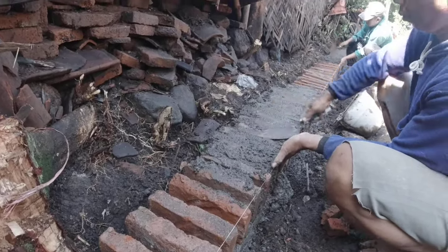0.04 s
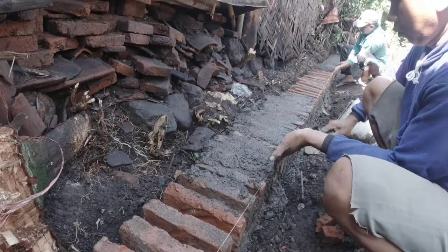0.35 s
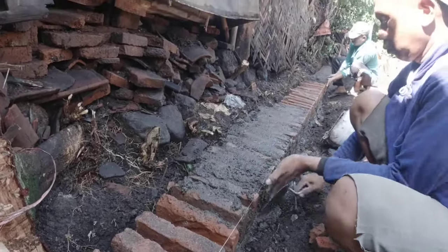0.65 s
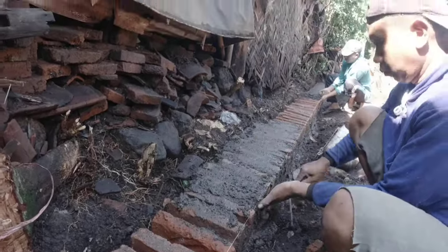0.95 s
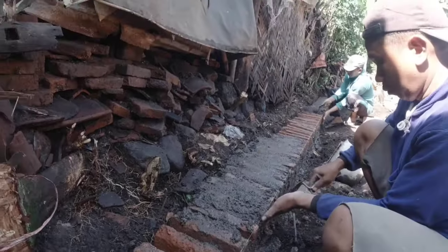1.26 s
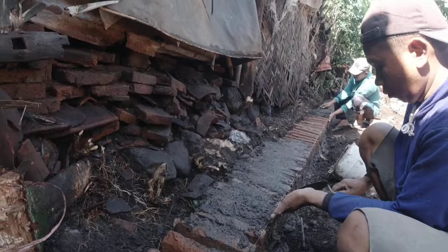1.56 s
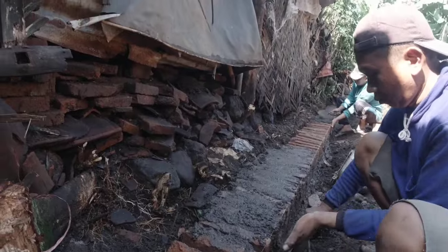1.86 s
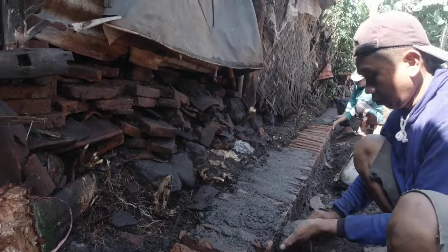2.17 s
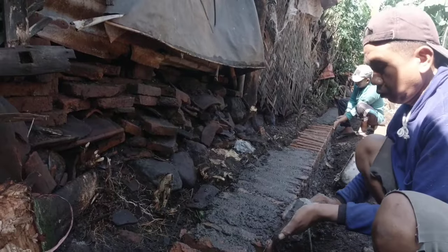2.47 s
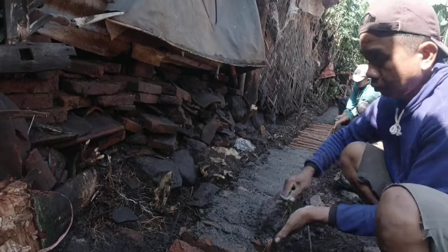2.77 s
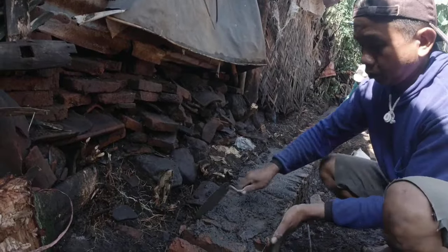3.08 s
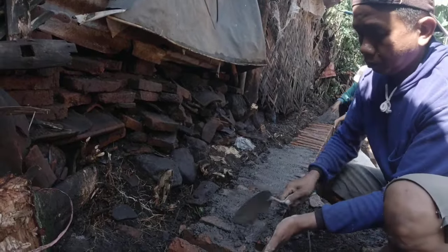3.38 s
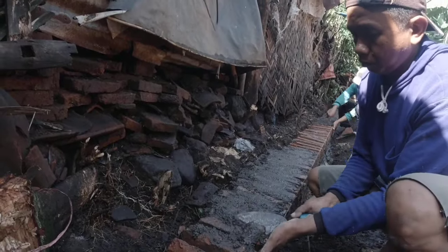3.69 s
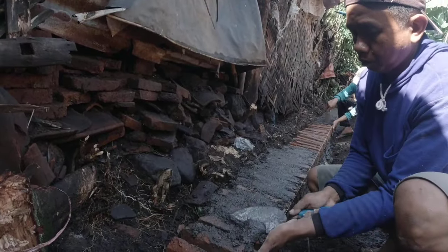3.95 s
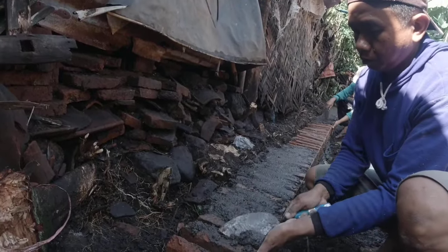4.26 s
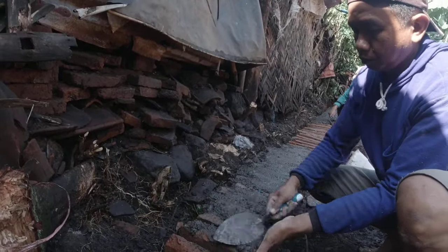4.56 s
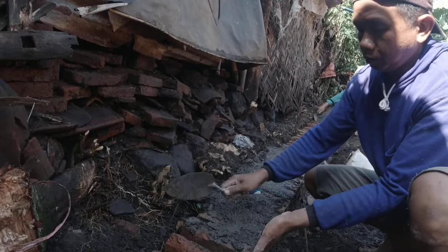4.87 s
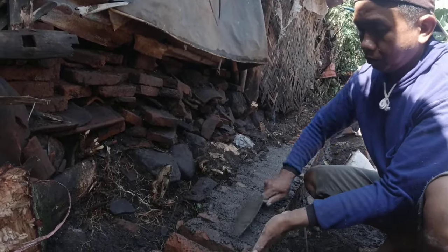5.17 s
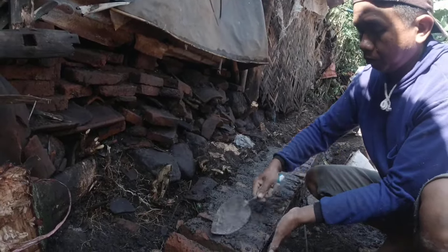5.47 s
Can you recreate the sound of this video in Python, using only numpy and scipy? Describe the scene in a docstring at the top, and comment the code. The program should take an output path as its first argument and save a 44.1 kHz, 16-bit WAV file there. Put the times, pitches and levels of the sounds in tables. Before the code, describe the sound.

Close by, a steel trowel scrapes sandy mortar over bricks with a few bright clinks. It then digs in a tub, giving hollow, muffled scrapes and knocks as wet lumps thud. After some faint brushing, the blade returns to the bricks for short, irregular strokes and ringing taps, with a heavier wet slap near the end. Only a faint outdoor rumble and hiss lies behind the work.

```python
"""Spreading mortar on bricks

A bricklayer works close by, outdoors. Sand grinds under the steel trowel, which rings
when its blade is free and goes dull in the wet mortar. A tub booms as mortar is scooped,
lumps thud and squelch, and between strokes the blade grazes the sand."""
import sys
import numpy as np
from scipy import signal
from scipy.fft import rfft, irfft, next_fast_len
from scipy.io import wavfile
from scipy.ndimage import uniform_filter1d

SR = 44100
rng = np.random.default_rng(int(sys.argv[2]) if len(sys.argv) > 2 else 0)


def materialize(psi):
    """Save the field psi as 16-bit PCM at rate SR to the path in sys.argv[1].

    A 1-D psi becomes a single channel; in a 2-D psi each row is a channel.
    """
    bounded = np.clip(np.atleast_2d(psi).T, -1, 1)
    quanta = np.round(bounded * 32767).astype(np.int16)
    wavfile.write(sys.argv[1], SR, quanta)


N = 243873

# Tone colours (how strong each pitch is): pitch_hz, level_db
AIR_COLOUR = [(20, -12.5), (55, 3.5), (80, -0.5), (160, -16.5), (400, -22.5), (1200, -23.5), (3200, -28),
              (5500, -28), (8500, -48.5), (16000, -45)]  # outdoor background
GRAZE_COLOUR = [(300, -22), (900, -18), (1800, -5.5), (3000, 3.5), (4400, -6), (5900, -7), (7500, -28),
                (9000, -62), (15000, -50)]  # sand touched lightly
SAND_COLOUR = [(30, -32), (60, 3.5), (110, -4.5), (170, 3), (400, 0), (800, -1), (1400, 0.5), (2200, -6),
               (4200, -2.5), (6300, -10), (7600, -14), (8600, -20.5), (11000, -16.5), (15000, -19)]  # sand ground under steel
SIDE_COLOUR = [(60, -23), (150, -20.5), (260, -16), (500, -9), (1100, -6), (2300, 1), (4400, -1),
               (15000, 0.5)]  # the part that differs between left and right
ECHO_COLOUR = [(200, -4.5), (3000, 1), (7000, 2.5), (12000, 0.5)]
SPLAT_COLOUR = [(60, -12.5), (200, 2.5), (550, 3.5), (1400, -7.5), (3000, -35), (9000, -62)]
# The notes the tub rings at: pitch_hz, width_hz, level_db
TUB_NOTES = [(76.8, 8.8, 10.5), (162.3, 16, -1.5), (188.6, 6.2, 13), (254, 5, -7), (285, 2.8, -5),
             (362, 16, -5.5), (488.8, 7.5, 13.5), (547.6, 3.3, 12), (574.8, 5.1, 10.5), (679, 7.6, 5.5),
             (801, 13.5, 7.5), (845, 4.7, 6.5)]
# The notes of the steel blade, free or pressed flat: pitch_hz, width_hz, free_db, pressed_db
BLADE_NOTES = [(1226, 13, -8.5, 19), (1286, 15, 17.5, 11), (1630, 6, 20.5, 0), (1784, 12, -3, 19.5),
               (1855, 16.6, 28, -14.5), (2326, 55, 0.5, 15.5), (2444, 11.74, 22, 13), (2518, 21, 19, 8.5),
               (3033, 16, 11, 16.5), (3324, 34, 17.5, 3), (3920, 16, 15.5, -2), (4270, 34, 21.5, -7.5),
               (4450, 8.6, 21, -8.5), (5120, 40, 15.5, -12.5), (5190, 34, 22, 0.5), (5440, 60, 20, -2),
               (5980, 19, 16, 16.5), (6400, 30, 24, 3.5), (6444, 25, 19.5, -5), (7490, 24, 21, 14.5),
               (9830, 26, 17.5, 13), (10650, 32, 11, -10), (12000, 23, 10, -11.5), (12200, 30, 24, -9),
               (13100, 63, 3, 13), (13800, 86, 12.5, 2), (13800, 81, 9, -6.5)]
# The sound's four bands (mortar rumble, blade rasp, grinding, sand fizz): low_hz, high_hz
BANDS = [(74, 900), (900, 2000), (2000, 8000), (8000, 16000)]
# How fast each band rises as the blade bites, one per band: rise_s
BAND_RISE_S = [0.0049, 0.001, 0.011, 0.0055]
# How each band stretches or shortens a stroke's fade, one per band: fade_factor
BAND_FADE = [1.28, 0.74, 0.92, 0.94]
# What each band gains by mid-stroke, where the blade is fastest, one per band: boost_db
BAND_BOOST_DB = [0.67, 0.48, 0.55, 3.7]

# The blade grazes the sand: start_s, length_s, fade_s, level_db, swell_db, blade_ring
GRAZES = [(0.598, 0.073, 0.027, -51, -3, 0.12), (2.688, .06, 0.014, -65.5, 1, .23),
          (2.751, 0.0052, 0.013, -50, 1, .86), (2.781, 0.025, 0.054, -51, -5, 0.53),
          (2.84, .03, 0.1, -59.5, -1, .7), (3.06, .05, 0.083, -68, -2, 0.86),
          (5.479, 0.064, .016, -44.5, 10, 1.3)]
# Lumps of mortar land: start_s, level_db, pitch_hz, decay_s
LUMPS = [(0.04, -29, 284, 0.0081), (0.102, -37, 79, 0.041), (0.242, -30, 571, 0.015),
         (0.39, -46.5, 207, 0.049), (.5, -48.5, 242, 0.016), (1.194, -34, 330, 0.01),
         (1.471, -24, 149, 0.0099), (1.497, -25.5, 147, 0.044), (1.545, -25, 198, .025),
         (1.68, -28.5, 195, .03), (1.731, -17, 172.5, 0.024), (1.747, -18, 478, 0.019),
         (1.765, -26, 345.6, 0.064), (1.809, -26, 160, 0.042), (2.319, -21.5, 157.6, 0.058),
         (2.324, -22, 395, 0.019), (3.137, -38, 309, 0.0094), (3.207, -40.5, 370, 0.028),
         (3.279, -36.5, 368, 0.013), (3.3, -32, 750, 0.006), (3.428, -42.5, 82, 0.065),
         (3.738, -43, 300, 0.011), (4.071, -30.5, 258, 0.012), (4.649, -27.5, 214, 0.0057),
         (4.726, -15, 302, 0.013), (4.768, -14.5, 218, 0.009), (4.794, -16, 192.3, 0.03),
         (4.821, -16, 458, 0.0146), (5.031, -32, 197.4, 0.028), (5.301, -21, 710, 0.0049)]
# Air pockets squelch: start_s, level_db, pitch_hz, decay_s, glide_octaves_per_s
AIR_POCKETS = [(.003, -30, 1390, 0.0067, 65), (0.016, -32, 955, .005, 78), (1.544, -22.5, 1060, 0.0035, 11),
               (1.9447, -13.5, 1130, 0.001, 6), (4.226, -27.5, 1890, 0.0033, -56)]
# The blade snaps free: start_s, level_db, pitch_hz, decay_s
BLADE_SNAPS = [(.164, -30.5, 1839, 0.038), (0.304, -47.5, 1300, 0.069), (2.783, -48, 3230, 0.018),
               (3.452, -30, 1206, 0.022), (3.492, -39, 1135, 0.013), (3.513, -32, 1128, 0.0043),
               (3.704, -39, 1274, 0.025), (3.775, -35.5, 1276, 0.013), (4.171, -31, 1240, 0.0051),
               (4.336, -27, 1260, 0.006), (4.384, -30, 1232, 0.01), (4.406, -40.5, 1170, 0.014),
               (5.194, -36.5, 3350, 0.011), (5.303, -31.5, 3390, 0.02), (5.513, -39.5, 4300, .03)]
# In the next three tables, rumble_db, rasp_db and fizz_db are added to the grinding's level_db.
# The edge catches on stone or brick: start_s, level_db, rasp_db, fizz_db, decay_s, blade_ring
EDGE_CATCHES = [(.089, -32.5, -14.5, -6, .016, 0.7), (0.115, -35, -8, 6.5, 0.015, 0.82),
                (.145, -25.5, -9.5, -1, 0.01, 1.1), (0.164, -27, -27, -11, .007, .89),
                (.235, -28, -5, -9, .0067, 0.18), (.3, -30, -6, -29, 0.016, 0.69),
                (.777, -46, -2.5, -23.5, .013, 0.63), (1.468, -39, -5, -10, .011, 0.71),
                (1.544, -34.5, 9.5, -10, .0055, 0.54), (1.673, -32.5, 1.5, -5.5, 0.009, 0.62),
                (1.727, -29.5, -22, -10, 0.0096, 0.11), (1.89, -35.5, 3.5, -10, 0.014, 0.3),
                (1.943, -34.5, 0.5, -9.5, .013, 0.22), (1.962, -37, -10, -4, 0.0066, 0.25),
                (2.185, -34.5, -20.5, -3, 0.0089, 0.9), (2.32, -34, 5.5, -14.5, 0.008, .2),
                (2.781, -53.5, -23, -39, 0.0088, 0.34), (3.3, -36.5, -5, -8.5, 0.0071, 0.21),
                (3.336, -35.5, -24, -5, 0.012, 1.2), (3.411, -29.5, 0, -4.5, 0.0067, .2),
                (3.447, -38.5, 4, 0, 0.0062, 0.16), (3.609, -51.5, -16, 0.5, 0.01, .44),
                (3.776, -52, 0, -20, 0.0051, .5), (4.333, -49.5, -4.5, -9, 0.023, 0.22),
                (4.885, -35, 4.5, -14, 0.012, 0.31), (4.911, -23, -14, -21, 0.0062, 0.16),
                (5.188, -43, -3, -4.5, 0.012, 0.42), (5.283, -42.5, -18, -12, 0.021, 0.66),
                (5.301, -29, -2.5, -9, 0.0053, 0.81)]
# The trowel digs in the tub:
# start_s, length_s, fade_s, level_db, swell_db, rumble_db, rasp_db, fizz_db, tub_ring
TUB_DIGS = [ (1.03, 0.14, .03, -65, -0.5, 0.5, 1, -36, 0.35),
            (1.149, 0.035, 0.012, -65, 6, 11.5, 7.5, -30, .7),
            (1.191, 0.097, 0.048, -54.5, -2.5, 8, 6.5, -22, 0.39),
            (1.282, 0.19, 0.014, -52.5, 2, -0.5, -1.5, -10.5, 0.78),
            (1.466, 0.098, 0.023, -47.5, 9.5, 12, 2.5, -10, 1.3),
            (1.58, 0.12, 0.033, -41.5, -9.5, -3, -2, -11, 0.72),
            (1.677, 0.071, .012, -39.5, -3, 10, 5, -11.5, 2.6),
            (1.745, 0.086, 0.061, -50, -5.5, 22, 7.5, -14, 1.7),
            (1.808, 0.11, 0.023, -44, -10, 10, -1, -7, 0.65), (1.95, 0.14, .02, -50, -2, 2, 3.5, -5, 1.2),
            (2.049, 0.17, 0.038, -40.5, -3, 0, -1.5, -6, 0.94), (2.23, 0.083, .02, -49.5, 4, 3, 3, -6, 1.3),
            (2.321, .055, 0.039, -45.5, -2.5, 16, 7, -9, 0.66),
            (2.385, .128, 0.011, -53, -8.5, 11, -2.5, -13, 2.6), ]
# The trowel spreads mortar on the bricks (pressed runs from 0, free, to 1, flat):
# start_s, length_s, fade_s, level_db, swell_db, rumble_db, rasp_db, fizz_db, blade_ring, pressed
BRICK_STROKES = [ (0.0, 0.017, 0.061, -32.5, -9.5, -9, -2.5, -3, 0.38, 0.4),
                 (.083, 0.091, 0.034, -33.5, 6.5, -20, -10.5, -7, 0.7, 0.16),
                 (.18, .05, 0.025, -44, 3, -18.5, -3, -2, 0.35, 0),
                 (.234, 0.11, 0.025, -38.5, 0.5, -8, -10, -6, 0.38, 0.11),
                 (.42, 0.17, .02, -68.5, 4, -13, -9, -32, 0.86, 0.18),
                 (.778, .18, 0.051, -50, 0, -22, -9, -4, 0.087, 0.7),
                 (3.303, 0.25, 0.0082, -42, -1.5, -10.5, 0, -5.5, 0.7, 0.7),
                 (3.599, 0.05, 0.12, -61, -2, -6, -6, -8.5, 0.54, 0.5),
                 (3.705, 0.07, 0.071, -47.5, 6, -6, -4, -7.5, 0.84, 1),
                 (3.822, 0.057, 0.073, -45, 1.5, -6, -4.5, -11, 0.37, 1),
                 (4.005, 0.044, 0.063, -50.5, -1.5, 8, 5, -31, 0.23, 0.63),
                 (4.172, 0.041, 0.028, -43, 10.5, -13.5, 1.5, -8, 0.15, .96),
                 (4.386, 0.044, 0.055, -50.5, -4, -8.5, 5.5, -7, 0.27, 0.87),
                 (4.623, 0.11, 0.019, -43, 9.5, -1.5, -3.5, -9.5, 0.19, 0.062),
                 (4.716, 0.14, 0.12, -40, 5.5, 6.5, 1.5, -9.5, 0.26, 0.47),
                 (4.96, 0.12, .035, -48.5, -10, -5.5, -1, -8.5, 0.28, 0.16),
                 (5.13, 0.16, 0.048, -56.5, -4, 2, -4.5, -13, 0.77, 0.11),
                 (5.302, 0.049, 0.049, -37.5, -5, -14.5, -1.5, -4, 0.48, .7), ]


def amp(db):
    """Turns decibels into a gain."""
    return 10 ** (np.asarray(db) / 20)


def evened(x):
    """Scales x to an average (rms) level of 1."""
    return x / np.sqrt(np.mean(abs(x) ** 2) + 1e-20)


def gain_at(colour, hz):
    """Reads the gain at each pitch from a tone colour."""
    pitches, db = np.transpose(colour)
    return amp(np.interp(np.log(hz + 1), np.log(pitches + 1), db))


def coloured(x, colour):
    """Gives x a tone colour."""
    return irfft(rfft(x) * gain_at(colour, np.fft.rfftfreq(len(x), 1 / SR)), len(x))


def add(mix, start_s, sound):
    """Adds a sound to the mix at its start time."""
    part = mix[max(round(start_s * SR), 0):][:len(sound)]
    part += sound[:len(part)]


def wander(n, rate_hz):
    """A smooth random drift that stays between -2 and 2."""
    size = next_fast_len(n + SR // 8, True)
    hz = np.fft.rfftfreq(size, 1 / SR)
    drift = evened(irfft(rfft(rng.standard_normal(size)) / (1 + (hz / rate_hz) ** 4), size))
    return 2 * np.tanh(drift[:n] / 2)


def burst(t, decay, rise=0.0026):
    """The loudness of a soft hit: a short rise, then a dying tail."""
    return (1 - np.exp(-(t / rise) ** 2)) * np.exp(-np.maximum(t - rise, 0) / decay)


def ping(hz, decay, glide=0, rise=0.0011):
    """A softly struck, dying tone whose pitch may slide."""
    t = np.arange(SR // 2) / SR
    pitch = hz * 2 ** (glide * np.minimum(t, 2 * decay))
    return np.sin(2 * np.pi * np.cumsum(pitch) / SR) * burst(t, decay, rise)


def note(hz, centre, width):
    """A filter for one ringing note: the narrower it is, the longer it rings."""
    return 1 / (1 + 2j * (hz - centre) / width)


def grit(n, grain_db=0, slip_db=1, grain_hz=900, slip_hz=75):
    """Sand under steel makes tiny cracks, bunched as the blade sticks and slips."""
    noise = rng.standard_normal(n)
    return evened(noise * amp(grain_db * wander(n, grain_hz) + slip_db * wander(n, slip_hz)))


def push(t, rise, length, fade, db, swell, lift=1.03):
    """The hand presses, swells or eases, then lets go; lift above 1 steepens the fade."""
    held = amp(db + swell * (np.minimum(t / length, 1) - 0.5))
    letting_go = np.exp(-(np.maximum(t - length, 0) / fade) ** lift)
    return (1 - np.exp(-t / rise)) * held * letting_go


def outdoor_air(level_db=-59.5):
    """Quiet outdoor rumble and hiss, swelling a little."""
    return amp(level_db + wander(N, rate_hz=3.3)) * evened(coloured(rng.standard_normal(N), AIR_COLOUR))


def yard_echoes(x, delay_s=0.012, decay_s=0.053):
    """The yard sends back a dying cloud of echoes."""
    t = np.arange(SR // 3) / SR
    bounces = rng.standard_normal(len(t)) * (t > delay_s) * np.exp(-t / decay_s)
    echoes = signal.fftconvolve(x, bounces / np.linalg.norm(bounces))[:N]
    return coloured(echoes, ECHO_COLOUR)


def blade_grazes():
    """The blade barely touches the sand: a soft brushing with two ringing notes."""
    out, t = np.zeros(N), np.arange(SR // 2) / SR
    hz = np.fft.rfftfreq(SR, 1 / SR)
    steel = amp(6.5) * note(hz, 3220, 55) + amp(15) * note(hz, 4250, 70)
    for start, *motion, ring in GRAZES:
        force = push(t, 0.0033, *motion) * grit(len(t), grain_db=2.5, slip_db=-1)
        response = evened((1 + ring * steel) * gain_at(GRAZE_COLOUR, hz))
        add(out, start, irfft(rfft(force, SR) * response))
    return out


def wet_mortar(thud_db=-4, splat_db=-11):
    """Lumps land with a dull thud and a wet splat; air pockets pop."""
    out, t = np.zeros(N), np.arange(SR // 2) / SR
    for start, db, hz, decay in LUMPS:
        splat = evened(coloured(grit(len(t), grain_db=1), SPLAT_COLOUR)) * burst(t, decay)
        add(out, start, amp(db + thud_db) * ping(hz, decay) + amp(db + splat_db) * splat)
    for start, db, hz, decay, glide in AIR_POCKETS:
        add(out, start, amp(db) * ping(hz, decay, glide, rise=0.00065))
    return out


def blade_snaps(overtone_db=-15, scuff_db=-15):
    """The bent blade springs free and rings, with a higher note and a scuff of sand."""
    out, t = np.zeros(N), np.arange(SR // 2) / SR
    for start, db, hz, decay in BLADE_SNAPS:
        scuff = evened(coloured(grit(len(t)), SAND_COLOUR)) * burst(t, decay)
        tone = ping(hz, decay, rise=0.002) + amp(overtone_db) * ping(hz * 3.45, decay, rise=0.002)
        add(out, start, amp(db) * (tone + amp(scuff_db) * scuff))
    return out


def blade_and_tub(hz, blade_ring, pressed, tub_ring, damping=0.48):
    """A filter that adds the ring of blade and tub; pressing reshapes and damps the blade's notes."""
    steel = sum(amp(free + pressed * (flat - free)) * note(hz, pitch, width * (1 + damping * pressed))
                for pitch, width, free, flat in BLADE_NOTES)
    hollow = sum(amp(db) * note(hz, pitch, width) for pitch, width, db in TUB_NOTES)
    return 1 + blade_ring * steel + tub_ring * hollow


def rub(forces, bands, **contact):
    """One force per band shakes the blade and tub; each band keeps the level of its force."""
    size = next_fast_len(len(forces[0]) + SR // 3, True)
    hz = np.fft.rfftfreq(size, 1 / SR) + 1
    response = blade_and_tub(hz, **contact) * gain_at(SAND_COLOUR, hz)
    spectrum = 0
    for force, (low, high) in zip(forces, bands):
        band = 1 / np.sqrt((1 + (low / hz) ** 10) * (1 + (hz / high) ** 20))
        spectrum += rfft(force, size) * evened(response * band)
    return irfft(spectrum, size)[:size - SR // 15]


def edge_catches():
    """The edge hits stone or brick, and a short crunch makes the blade clink."""
    out, t = np.zeros(N), np.arange(SR // 12) / SR
    for start, db, rasp, fizz, decay, ring in EDGE_CATCHES:
        crunch = grit(len(t), grain_db=-2, slip_db=1.5) * burst(t, decay, rise=0.0024)
        forces = [amp(db + offset) * crunch for offset in (rasp, 0, fizz)]
        add(out, start, rub(forces, BANDS[1:], blade_ring=ring, pressed=0.18, tub_ring=0))
    return out


def lumpy(x, patch_db=4):
    """Lumps and hollows under the blade briefly favour pitches that keep shifting."""
    frames = dict(nperseg=512, noverlap=384)
    spectra = signal.stft(x, **frames)[2]
    patches = uniform_filter1d(rng.standard_normal(spectra.shape), size=3, axis=0)  # blur in pitch
    patches = evened(uniform_filter1d(patches, size=7, axis=1))  # blur in time
    return signal.istft(spectra * evened(amp(patch_db * patches)), **frames)[1][:N]


def scrape(length, fade, db, swell, rumble, rasp, fizz, shudder_db=-0.5, shudder_hz=45, **contact):
    """One push grinds sand against the blade; the hand's shudder moves all bands together."""
    t = np.arange(SR // 2) / SR
    speed = np.sin(np.pi * np.minimum(t / length, 1)) - 2 / np.pi  # above or below its average
    shudder = evened(amp(shudder_db * wander(len(t), shudder_hz)))
    forces = []
    for offset, rise, linger, boost in zip((rumble, rasp, 0, fizz), BAND_RISE_S, BAND_FADE, BAND_BOOST_DB):
        pressure = push(t, rise, length, fade * linger, db + offset + boost * speed, swell)
        forces.append(pressure * shudder * grit(len(t)))
    return rub(forces, BANDS, **contact)


def trowel_strokes():
    """Spreading on the bricks lets the blade ring; digging muffles it and makes the tub boom."""
    out = np.zeros(N)
    for start, *motion, ring, pressed in BRICK_STROKES:
        add(out, start, scrape(*motion, blade_ring=ring, pressed=pressed, tub_ring=0.17))
    for start, *motion, boom in TUB_DIGS:
        add(out, start, scrape(*motion, blade_ring=0.23, pressed=0.67, tub_ring=boom))
    return out


def scene(yard_db=-19, side_db=-2):
    """The work is heard close up in stereo, with gritty scatter from the ground and bricks."""
    work = lumpy(trowel_strokes() + blade_grazes()) + edge_catches() + blade_snaps() + wet_mortar()
    middle = work + outdoor_air() + amp(yard_db) * yard_echoes(work)
    scatter = lumpy(trowel_strokes() + blade_grazes()) + edge_catches() + outdoor_air()
    hz = np.fft.rfftfreq(N, 1 / SR)
    # Low sound reaches the right side first, high sound either side.
    lean = np.tanh(4 * wander(len(hz), 12) + (3000 / (hz + 300)) ** 3)
    shifted = irfft(-1j * lean * rfft(middle), N)
    side = amp(side_db) * coloured(0.68 * shifted + 0.73 * scatter, SIDE_COLOUR)
    return np.array([middle + side, middle - side])


def record(dry):
    """Cuts away the highest treble, above 15750 Hz."""
    low_pass = signal.firwin(511, 15750, window=("kaiser", 9), fs=SR)
    return signal.oaconvolve(dry, low_pass[None], "same")


dry = scene()
out = record(dry)
materialize(out)
```